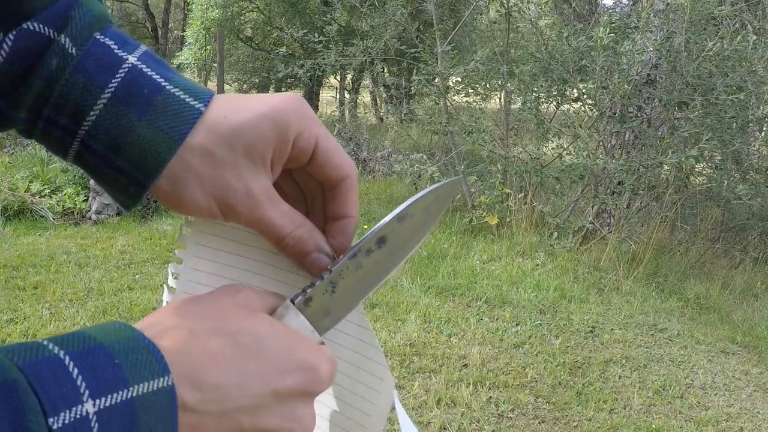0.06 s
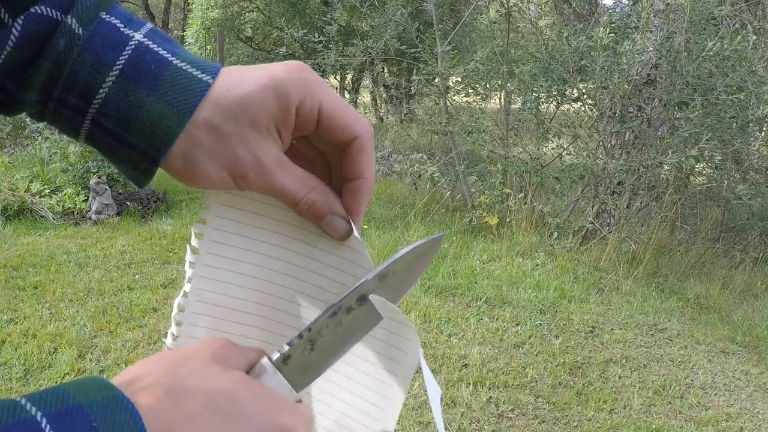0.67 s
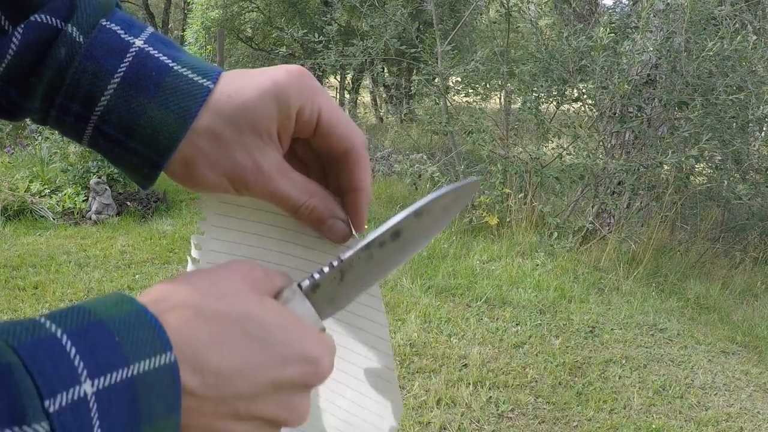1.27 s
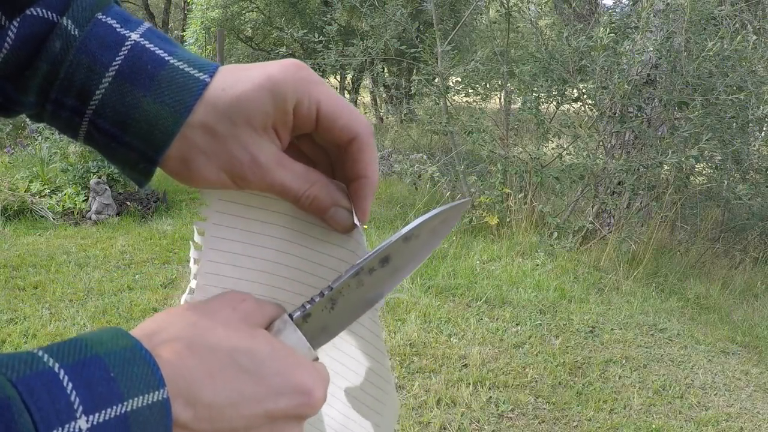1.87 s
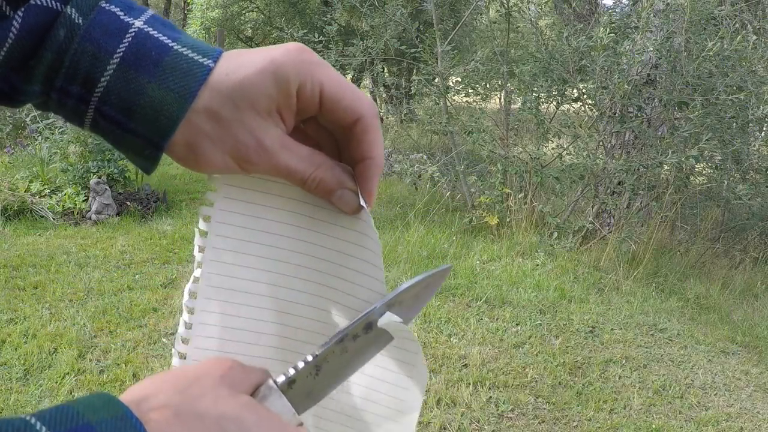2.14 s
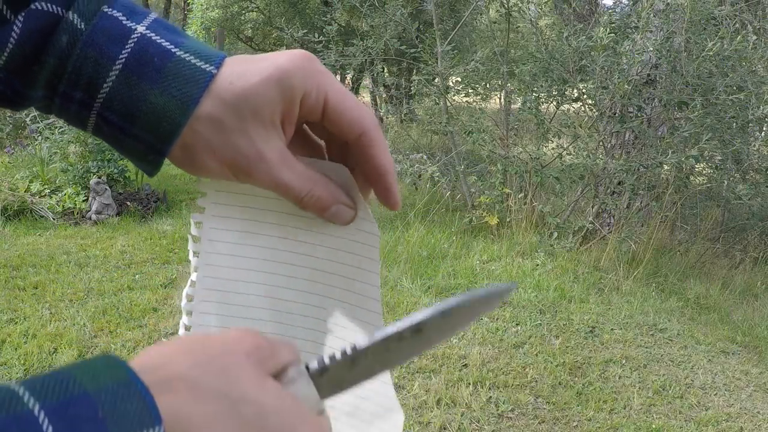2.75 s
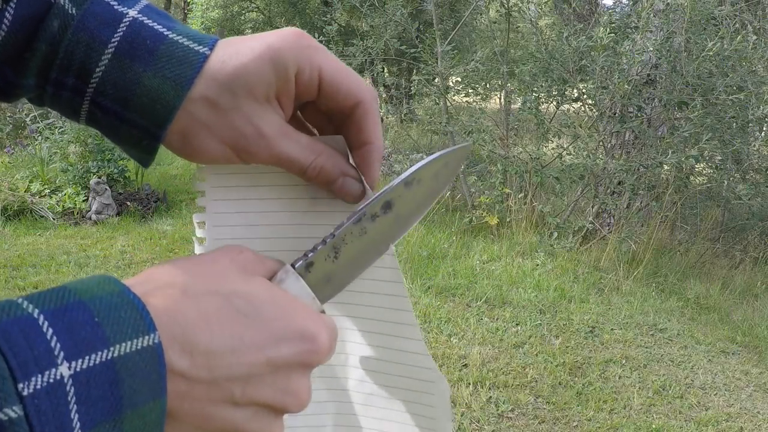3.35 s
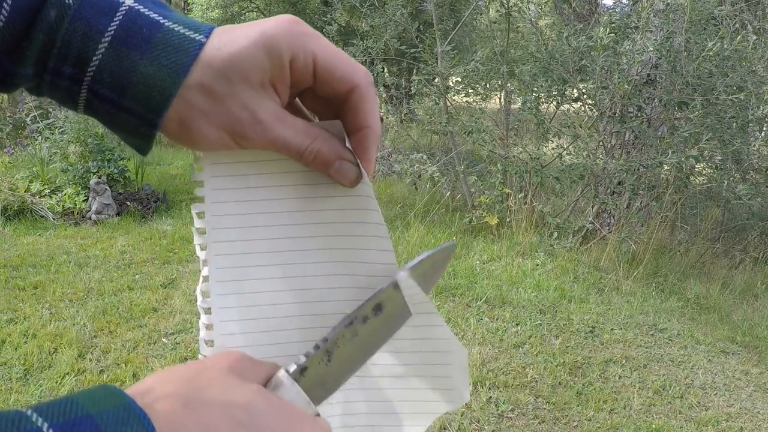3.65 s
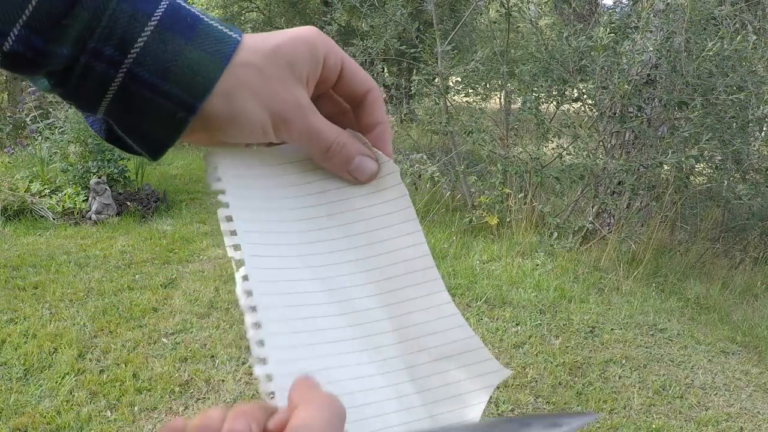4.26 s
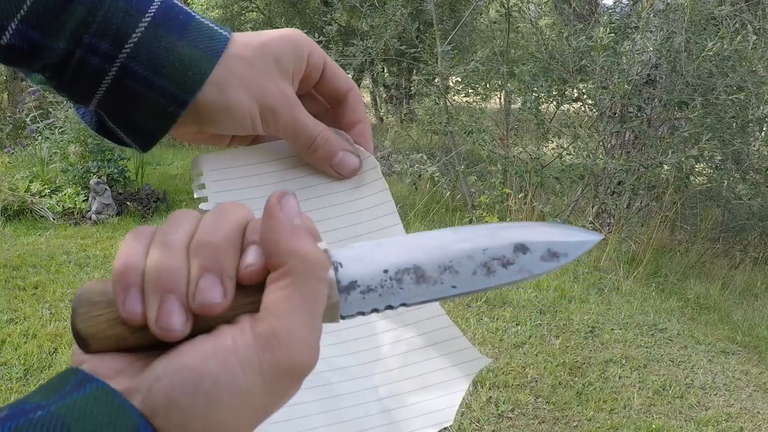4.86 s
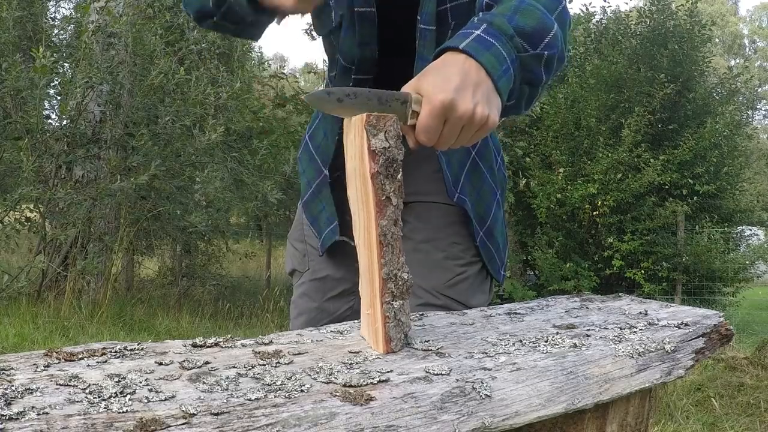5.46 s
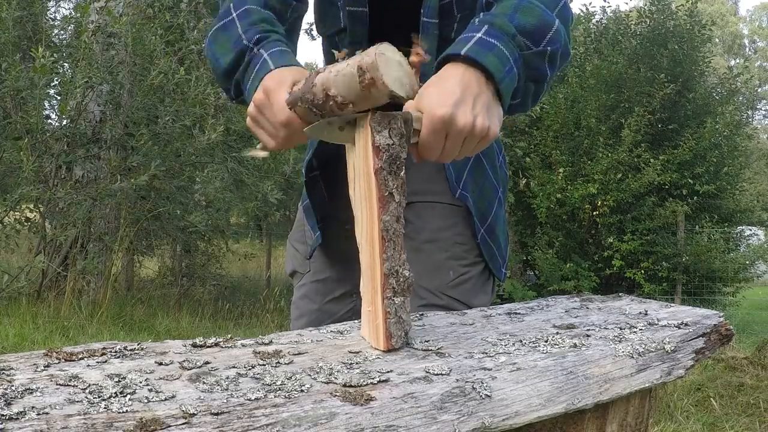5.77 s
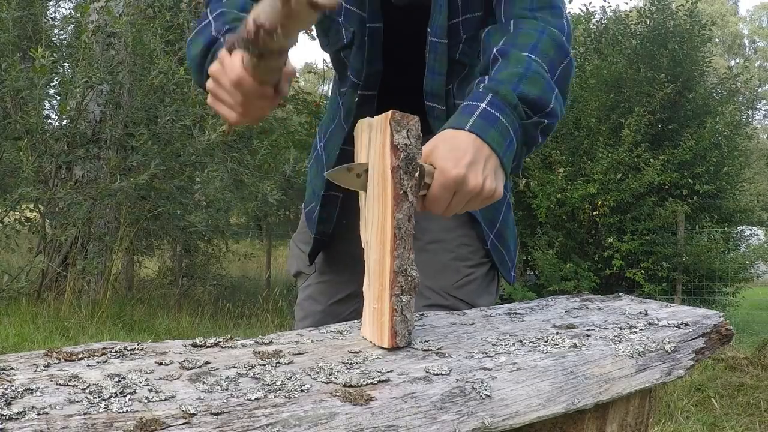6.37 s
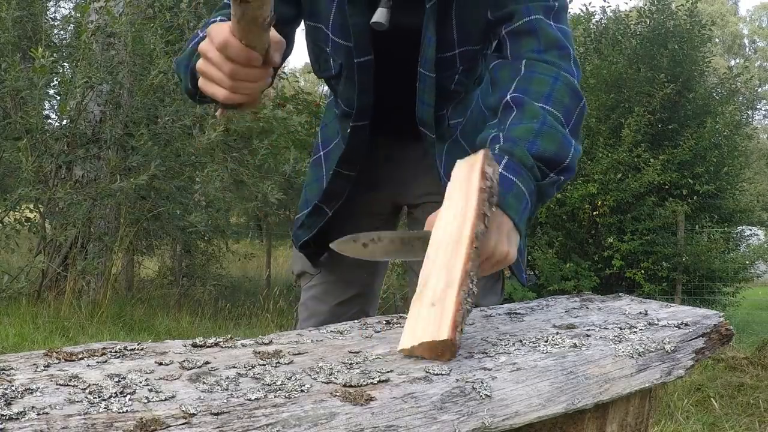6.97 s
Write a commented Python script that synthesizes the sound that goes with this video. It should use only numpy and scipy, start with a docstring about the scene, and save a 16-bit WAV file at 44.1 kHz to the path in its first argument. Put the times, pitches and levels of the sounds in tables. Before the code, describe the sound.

Outdoors, a knife rasps through rustling paper, then a baton knocks the blade through wood, which cracks apart and clatters down.

```python
"""Outdoors, over low wind and distant leaves, a sharp knife slices four strips off a hand-held sheet.
Each cut is thousands of tiny fibres snapping; the paper rustles between cuts and buckles at the end.
Then a wooden baton drives the knife through a piece of wood standing on a log: four cracking thuds
that overload the microphone and echo faintly from the trees. The last blow splits the wood,
and the loose piece clinks and clatters down with faint thin squeaks."""
import sys
import numpy as np
from scipy import signal
from scipy.fft import rfft, irfft
from scipy.io import wavfile
from scipy.ndimage import uniform_filter1d

SR = 44100
rng = np.random.default_rng(int(sys.argv[2]) if len(sys.argv) > 2 else 0)


def wrap_up_sound(samples):
    """Save the sound to the file named by the first command line argument, as 16-bit audio."""
    columns = np.atleast_2d(samples).T
    # keep every value between -1 and 1, then stretch to whole-number steps
    tamed = np.clip(columns, -1, 1)
    steps = np.round(tamed * 32767).astype(np.int16)
    wavfile.write(sys.argv[1], SR, steps)


N = 318843
TIME, HZ = np.arange(N) / SR, np.fft.rfftfreq(N, 1 / SR)

# Loudness along each cut, one list a cut: time_s, sheet_db, hiss_db, fizz_db (last two add to sheet_db)
CUT_LEVELS = [
    [(0.405, -46.5, -1.5, -6), (0.457, -39.5, -4, -11), (0.599, -35.5, -6, -10), (0.649, -32, -6, -9),
     (0.683, -38, 4.5, 0), (0.853, -27.5, 3, -8), (0.885, -29.5, 6.5, -6.5), (0.935, -28.5, 2.5, -6.5),
     (0.962, -31, 7.5, -8)],
    [(1.672, -42, 3, -16), (1.754, -36.5, 0.5, -8), (1.76, -33, -1.5, -11), (1.784, -40.5, 4.5, -0.5),
     (1.978, -36, 3.5, -10)],
    [(2.06, -35.5, 2, -13), (2.092, -31.5, -1, -2), (2.212, -28.5, 0.5, -7.5), (2.282, -28.5, -4, -10),
     (2.348, -30.5, 5, -8), (2.384, -30.5, 1.5, -13), (2.464, -28, -2, 0), (2.485, -31, 0, -3)],
    [(3.345, -49.5, 5.5, -6), (3.379, -39.5, 5, -7), (3.471, -30.5, -5.5, -37), (3.593, -32.5, 0, -13),
     (3.679, -29, 3.5, 2), (3.693, -23.5, 0, -9), (3.731, -27, 2.5, 0), (3.797, -25.5, -2.5, -22),
     (3.865, -21, -7, -21), (3.98, -27, 1.5, -4)],
]
# How the edge grips in each cut: flutter_db (adds to sheet_db), rasp_hz, judder_share (0 to 1)
CUT_GRIPS = [(-11, 5960, .3), (-10.5, 5100, .85), (-11.5, 5650, 0.1), (-12, 5900, 0.6)]
# Tone of the sheet in each of the four cuts: pitch_hz, level_db
CUT_1_TONE = [(88, -45), (150, -18.5), (352, -5.5), (462, -9), (509, -4.5), (681, -21.5), (844, -10),
              (1290, -3), (1830, -11), (2400, -9), (2980, -7), (4220, -9), (4750, -12), (7000, -8),
              (11800, -14), (15500, -23.5)]
CUT_2_TONE = [(88, -37), (150, -1), (366, 3), (656, -11.5), (827, -5), (1240, -6), (1370, 1), (1540, -6.5),
              (2500, -5), (2760, -3), (4060, -9), (5540, -2.5), (9000, -8.5), (10300, -4.5), (15500, -18)]
CUT_3_TONE = [(88, -45), (150, -5.5), (205, 7.5), (268, -2), (445, 3), (681, -12.5), (1000, -6.5),
              (1320, -4), (1830, -13.5), (2500, -11.5), (3300, -12.5), (5030, -9.5), (5760, -8), (9540, -8),
              (15500, -20)]
CUT_4_TONE = [(88, -50), (150, -27), (314, -9), (643, -18.5), (827, -7.5), (1370, 0.5), (2100, -3.5),
              (2650, -10), (2980, -6), (3690, -11), (4840, -11.5), (5540, -5), (6730, -11), (13300, -.5),
              (15500, 2)]

# The baton hits the blade: start_s, thud_db, cutoff_hz, tilt_db_per_octave, crack_db, blade_db
BLOWS = [(5.2209, 8, 803, -.5, -7, -25.5), (5.8140, 8, 1195, 0, -5.5, -25.5),
         (6.3034, -14.5, 3003, 6, -3, -3), (6.7538, -13, 3000, 2.5, -8.5, -19.5)]
# Ringing notes of wood and baton, wedged blade and heavy log: pitch_hz, level_db, fade_s (to fall 60 dB)
WOOD_NOTES = [(183.5, -3.5, .036), (277, 2, 0.026), (380, -0.5, 0.017), (545, -7, 0.023), (775, -6, 0.029),
              (1108, -7, 0.022), (1436, -12, 0.021), (2050, -11.5, 0.0085)]
BLADE_NOTES = [(1830, -14, 0.014), (2550, -25.5, 0.0067), (3110, -9, 0.018), (3318, 1.5, 0.022),
               (3900, -6.5, 0.01), (4660, -16, 0.01), (5700, -15, 0.031), (6930, -13.5, 0.02)]
LOG_NOTES = [(50.3, 2.5, 0.076), (92, 3, .3), (146, 3.5, 0.11), (194, -0.5, 0.14)]
# Wood fibres giving way: start_s, level_db, pitch_hz, fade_s
SPLITS = [(6.206, -30.5, 3000, 0.0088), (6.3144, -15.5, 4920, 0.009), (6.352, -40, 5950, .008),
          (6.430, -43, 9000, .006), (6.7594, -9, 6560, 0.0079), (6.7617, 1, 6760, 0.011),
          (6.7709, 0.5, 5470, 0.0058), (6.804, -23.5, 6060, 0.059), (6.8093, -15.5, 5520, 0.015),
          (6.851, -39, 3980, 0.057)]
# A quick second knock just after the first blow, then the split wood bouncing on the log: start_s, thud_db,
# cutoff_hz, boom_db, tick_db
BOUNCES = [(5.2445, -16.5, 381, -39.5, -43.5), (6.8119, -18, 690, -64, -31.5),
           (6.858, -27.5, 740, -39, -48.5), (7.053, -33.5, 705, -48, -61), (7.118, -37, 607, -45.5, -63),
           (7.145, -53.5, 299, -41.5, -52), (7.1955, -7.5, 396, -50.5, -23.5)]
# The split piece clinks, then faint thin squeaks: start_s, level_db, pitch_hz, spread_octaves, fade_s
CLINK_AND_SQUEAKS = [(6.857, -42, 2810, 0.032, 0.054), (7.052, -60.5, 2000, 0.021, 0.072),
                     (7.092, -63.5, 2026, 0.014, 0.24), (7.152, -69.5, 2750, 0.049, 0.055)]

# The sheet shifting between the fingers: start_s, length_s, crinkle_db, puff_db
RUSTLES = [(0.0, 0.032, -48.5, -52), (0.146, 0.015, -56, -74), (0.365, 0.042, -47.5, -55),
           (0.977, 0.012, -56, -40.5), (1.019, 0.19, -50, -58), (1.484, 0.0092, -51, -55),
           (1.545, 0.012, -51, -71), (1.996, 0.064, -39.5, -59), (2.494, .028, -47, -43),
           (2.587, .048, -42, -49.5), (2.711, 0.082, -43, -50), (2.823, 0.11, -44.5, -53.5),
           (2.966, 0.099, -46, -48), (3.111, 0.1, -51.5, -63), (3.231, 0.023, -47, -53),
           (3.299, 0.047, -45.5, -58), (3.972, .03, -45, -38.5), (4.307, .115, -54.5, -45)]
# Tone of the sheet rustling, buckling and pushing air: pitch_hz, level_db
RUSTLE_TONE = [(120, -41), (200, -7.5), (352, -3), (827, -11), (1150, -2), (1810, -7), (2700, -2.5),
               (3610, -6.5), (5390, -3), (10800, -10.5), (15500, -19)]
BUCKLE_TONE = [(88, -47.5), (150, 8), (352, 4), (643, -1), (1400, 8.5), (1910, -11), (2180, 0), (4220, -4),
               (9180, -4), (12000, -10), (15500, -27)]
PUFF_TONE = [(30, -8), (70, -1), (130, -7.5), (220, -6), (400, -3.5), (650, -17.5), (1500, -18),
             (5000, -39.5)]
# Single snaps and scrapes of the paper: start_s, level_db, pitch_hz, spread_octaves, fade_s
PAPER_SNAPS = [(0.403, -33.5, 4000, 0.87, 0.033), (0.982, -27, 1560, 0.55, .045),
               (1.076, -35, 2980, 0.46, .012), (1.186, -46, 8000, 1.1, 0.033),
               (1.487, -42.5, 2000, 1.2, 0.025), (1.7067, -25, 2020, 1.4, 0.014),
               (1.975, -33, 2000, 2.1, 0.007), (2.059, -17, 2010, 1.7, 0.006),
               (2.251, -28.5, 250, 0.72, 0.025), (2.583, -30, 1770, 1.7, 0.011),
               (2.605, -33, 2500, 1.3, 0.028), (2.825, -39, 4200, 1.7, 0.02),
               (3.014, -32.5, 4530, 0.88, 0.01), (3.188, -39, 1300, 0.45, 0.018),
               (3.334, -33, 5130, 0.24, 0.013), (3.361, -32, 5150, 0.14, 0.7),
               (3.434, -12.5, 4450, 0.77, 0.0023), (3.694, -24.5, 350, .7, 0.024),
               (3.872, -22, 321, 0.65, 0.037), (4.009, -25, 1740, 0.71, 0.02),
               (4.204, -27.5, 10900, 0.15, 0.0053), (4.321, -22.5, 4020, 0.48, .03),
               (4.3253, -19, 1586, 0.83, 0.034), (4.326, -7, 5600, 0.34, 0.0045),
               (4.353, -22.5, 8000, 0.93, 0.019), (4.363, -24, 1696, 0.64, 0.025),
               (4.375, -23, 1890, 0.61, 0.025)]

# Tone of the long echo from the trees and of one distinct reflection off their edge: pitch_hz, level_db
ECHO_TONE = [(80, -10.5), (250, -22), (450, -9), (900, -8), (1250, -4.5), (1700, -2), (2500, -6),
             (3500, -0.5), (7000, -4.5), (15000, -17)]
REFLECTION_TONE = [(200, -17), (1200, 0), (5000, 2.5), (14000, -3)]
# How long the trees echo: pitch_hz, fade_s
ECHO_FADES = [(100, 0.45), (700, 0.78), (1700, 0.64), (3500, 0.35), (8000, 0.2), (15000, 0.13)]
# Tone of the open air by the paper and by the log: pitch_hz, level_db
PAPER_AIR_TONE = [(12, -15), (20, 6), (35, -2), (119, -13), (342, -18.5), (393, -18), (649, -23),
                  (705, -25), (1040, -23.5), (1450, -28.5), (2760, -31), (14300, -36.5), (15500, -42.5)]
LOG_AIR_TONE = [(12, -36.5), (20, 1.5), (35, -8.5), (49, -12.5), (80, -17.5), (180, -28.5), (581, -33.5),
                (705, -32), (1130, -38.5), (1720, -39.5), (2400, -41), (3450, -42), (15500, -46)]
# Gain on the difference between left and right, for paper, wood and air: pitch_hz, gain_db
PAPER_WIDTH = [(60, -3.5), (130, -8.5), (290, -27), (640, -30.5), (1410, -54.5), (3100, -35), (6820, -12.5),
               (15000, -18)]
WOOD_WIDTH = [(60, -20.5), (130, -20.5), (290, -24.5), (640, -26), (1410, -23.5), (3100, -19), (6820, -16),
              (15000, -12)]
AIR_WIDTH = [(25, -15), (60, -8.5), (110, -4), (200, -5), (380, -8), (700, -6), (1290, -8), (2380, -4.5),
             (4400, -1), (8120, -1), (15000, 1.5)]


def slicing():
    """The edge parts thousands of fibres a second; the sheet flutters, rings and hisses with them."""
    out = np.zeros(N)
    clicks = drifting(fibres(per_s=15000, spread_db=2.5), depth_db=2.5)
    clicks *= flicker(depth_db=0.8, rate_hz=92.5)
    # The strip peeling off the blade has a rasping note of its own, which wanders as it curls.
    cut_ends_s = [rows[k][0] for rows in CUT_LEVELS for k in (0, -1)]
    rasp_hz = np.interp(TIME, cut_ends_s, np.repeat([hz for _, hz, _ in CUT_GRIPS], 2))
    rasp_hz *= 1 + 0.09 * wander(rate_hz=9)
    spectrum = rfft(clicks + 0.65 * resonate(clicks, rasp_hz, width_hz=2200))
    # Four bands, low to high: flutter follows the sheet; hiss and fizz swell in their own way.
    lowpasses = [1 / (1 + (HZ / hz) ** 8) for hz in (130, 750, 3000, 10500, 20000)]
    tones = [CUT_1_TONE, CUT_2_TONE, CUT_3_TONE, CUT_4_TONE]
    for rows, (flutter_db, _, judder_share), tone in zip(CUT_LEVELS, CUT_GRIPS, tones):
        times_s, sheet_db, hiss_db, fizz_db = np.transpose(rows)
        cut = spectrum * amp(value_at(tone, HZ))
        jerks = judder(times_s[0], judder_share)
        for lower, upper, band_db in zip(lowpasses, lowpasses[1:], [flutter_db, 0, hiss_db, fizz_db]):
            band = normalised(irfft(cut * (upper - lower), N))
            out += band * stroke(times_s, sheet_db + band_db) * jerks
    return amp(-0.38) * out


def fibres(per_s, spread_db):
    """Breaking fibres make random clicks, a few much louder than the rest."""
    sizes = amp(spread_db * np.minimum(rng.exponential(1, N), 4)) * rng.choice([-1, 1], N)
    return sizes * (rng.random(N) < per_s / SR)


def stroke(times_s, levels_db, bite_s=0.016, leave_s=0.0059):
    """Loudness of one cut, from the bite of the edge until it leaves the paper."""
    outside = np.maximum(times_s[0] - TIME, 0) / bite_s + np.maximum(TIME - times_s[-1], 0) / leave_s
    return amp(np.interp(TIME, times_s, levels_db)) * np.exp(-outside ** 2)


def judder(start_s, start_share, slips_per_s=130, slip_s=0.0025, settle_s=0.15):
    """Loudness of an edge that sticks and slips at first, then settles into a glide."""
    slips = (rng.random(N) < slips_per_s / SR) * rng.uniform(0.44, 1, N)
    power = signal.lfilter([1], [1, -np.exp(-1 / (slip_s * SR))], slips)
    share = start_share * np.exp(-((TIME - start_s) / settle_s) ** 2)
    return np.sqrt(1 - share + share * power / power.mean())


def splitting_wood(push_s=0.004):
    """Each blow cracks, rings the blade and thuds into the log; the wood splits, clinks and bounces."""
    out = np.zeros(N)
    blade, log = ring(BLADE_NOTES, rise_cycles=0.54), ring(LOG_NOTES)
    push_age = TIME[:SR // 4] / push_s
    push = push_age * (2 - push_age) * np.exp(-push_age)  # the log is shoved into the ground
    for start_s, thud_db, cutoff_hz, tilt, crack_db, blade_db in BLOWS:
        thud = wood_thud(cutoff_hz, tilt) + amp(-25.5) * log + amp(-16) * np.pad(push, (0, SR // 4))
        add(out, start_s, amp(crack_db) * burst(pitch_hz=2130, octaves=0.91, fade_s=0.022))
        add(out, start_s, amp(thud_db) * thud + amp(blade_db) * blade)
    shake = amp(-20.5) * wood_thud(cutoff_hz=617) + amp(-24) * blade  # set off by each split
    for start_s, level_db, pitch_hz, fade_s in SPLITS:
        add(out, start_s, amp(level_db) * burst(pitch_hz, octaves=0.9, fade_s=fade_s))
        add(out, start_s, amp(level_db) * shake)
    for start_s, thud_db, cutoff_hz, boom_db, tick_db in BOUNCES:
        add(out, start_s, amp(tick_db) * burst(pitch_hz=3200, octaves=0.64, fade_s=0.011))
        add(out, start_s, amp(thud_db) * wood_thud(cutoff_hz) + amp(boom_db) * log)
    for start_s, level_db, pitch_hz, octaves, fade_s in CLINK_AND_SQUEAKS:
        add(out, start_s, amp(level_db) * burst(pitch_hz, octaves, fade_s))
    return out


def wood_thud(cutoff_hz, tilt_db_per_octave=0, pivot_hz=280):
    """The struck wood rings briefly; a harder hit has a higher cutoff and sounds brighter."""
    notes = [(hz, db + tilt_db_per_octave * np.log2(hz / pivot_hz), fade_s)
             for hz, db, fade_s in WOOD_NOTES]
    return ring(notes, cutoff_hz)


def ring(notes, cutoff_hz=SR, rise_cycles=0.85):
    """Struck notes swell over their first cycle, bass last; a soft hit leaves the high ones weak."""
    t = TIME[:SR // 2]
    out = np.zeros(len(t))
    for k, (hz, db, fade_s) in enumerate(notes):
        swell = 1 - np.exp(-(hz * t / rise_cycles) ** 2)
        direction = (-1) ** k  # neighbouring notes swing opposite ways at the far end
        size = amp(db) / np.hypot(1, (hz / cutoff_hz) ** 2)
        out += direction * size * swell * fade(t, fade_s) * np.sin(2 * np.pi * hz * t)
    return out


def rustling():
    """The held sheet crinkles, buckles once, and snaps where the blade catches or leaves it."""
    crinkle = drifting(fibres(per_s=8100, spread_db=3), depth_db=1.4, frames=36, bins=7)
    crinkle *= flicker(depth_db=2.5, rate_hz=55)
    moves = sum(movement(start_s, length_s, db, rise_s=0.0058, fall_s=0.014)
                for start_s, length_s, db, _ in RUSTLES)
    buckle = movement(start_s=4.318, length_s=0.064, level_db=-35, rise_s=0.0024, fall_s=0.013)
    out = amp(-3.5) * normalised(shaped(crinkle, RUSTLE_TONE)) * moves
    out += normalised(shaped(crinkle, BUCKLE_TONE)) * buckle
    for start_s, level_db, pitch_hz, octaves, fade_s in PAPER_SNAPS:
        add(out, start_s, amp(level_db) * burst(pitch_hz, octaves, fade_s))
    return out


def puffing():
    """The loose sheet pushes air in soft, low puffs."""
    puffs = shaped(rng.standard_normal(N), PUFF_TONE) * flicker(depth_db=5, rate_hz=25.6)
    moves = sum(movement(start_s, length_s, db, rise_s=0.01, fall_s=0.028)
                for start_s, length_s, _, db in RUSTLES)
    return amp(-0.5) * normalised(puffs) * moves


def movement(start_s, length_s, level_db, rise_s, fall_s):
    """Loudness of one movement of the sheet: it rises, holds and falls."""
    before = np.maximum(start_s - TIME, 0) / rise_s
    after = np.maximum(TIME - start_s - length_s, 0) / fall_s
    return amp(level_db) * np.exp(-np.minimum(before + after, 20))


def echoes(sound, near_db, near_fade_s, far_db, blur_hz=100):
    """Sound scatters quickly off the ground and log, then comes back faintly from the trees."""
    t = TIME[:SR]
    far_taps, near_taps = rng.standard_normal((2, SR)) * (rng.random((2, SR)) < 0.1)
    hz, frame_s, spectra = signal.stft(far_taps, SR, nperseg=256)
    spectra *= fade(frame_s, value_at(ECHO_FADES, hz)[:, None])
    far_tail = signal.istft(spectra, SR, nperseg=256)[1][:SR] * (1 - np.exp(-t / 0.03))
    near_tail = near_taps * fade(t, near_fade_s) * (t > 0.005)
    blur = 2 * np.pi * np.cumsum(blur_hz * wander(rate_hz=201.4)) / SR  # smears notes into a wash
    far = phase_shifted(scattered(sound, far_tail), blur)
    return amp(far_db) * shaped(far, ECHO_TONE) + amp(near_db) * scattered(sound, near_tail)


def open_air(tone, level_db):
    """Lumpy low wind blows under a steady hiss of distant leaves."""
    middle, side = (normalised(shaped(rng.standard_normal(N), tone)) for _ in range(2))
    side = shaped(side, AIR_WIDTH)
    both = np.array([middle + side, middle - side])
    wind = irfft(rfft(both) / (1 + (HZ / 250) ** 4), N)
    leaves = both - wind
    return amp(level_db) * (leaves + wind * flicker(depth_db=3.5, rate_hz=7.3))


def stereo(sound, width):
    """Two close microphone openings hear slightly different pressure and a shifting scatter."""
    tail = rng.standard_normal(512) * np.exp(-np.arange(512) / 90)
    scatter = phase_shifted(scattered(sound, tail), 2 * wander(rate_hz=4))
    side = shaped(drifting(0.55 * np.gradient(sound) + 0.7 * scatter, depth_db=4), width)
    return np.array([sound + side, sound - side])


def burst(pitch_hz, octaves, fade_s, samples=8192):
    """A dying puff of noise around one pitch."""
    hz = np.fft.rfftfreq(samples, 1 / SR) + 1
    bump = 1 / np.cosh(np.clip(np.log2(hz / pitch_hz) / octaves, -20, 20))
    noise = normalised(irfft(bump * np.exp(2j * np.pi * rng.random(len(hz)))))
    return noise * fade(TIME[:samples], fade_s)


def drifting(sound, depth_db, frames=30, bins=6):
    """Makes the tone drift at random, as a sheet's does when it bends and the cut grows longer."""
    spectra = signal.stft(sound, nperseg=512, noverlap=384)[2]
    drift = uniform_filter1d(rng.standard_normal(spectra.shape), frames, axis=1)  # smooth over time
    drift = uniform_filter1d(drift, bins, axis=0)  # and over pitch
    return signal.istft(spectra * amp(depth_db * normalised(drift)), nperseg=512, noverlap=384)[1][:N]


def resonate(sound, pitch_hz, width_hz):
    """Picks out a band of the sound around a moving pitch."""
    turn = np.exp(2j * np.pi * np.cumsum(pitch_hz) / SR)
    feedback = np.exp(-np.pi * width_hz / SR)
    return 2 * (turn * signal.lfilter([1 - feedback], [1, -feedback], sound / turn)).real


def scattered(sound, tail):
    """Spreads a sound into the many small echoes of a tail."""
    return signal.fftconvolve(sound, tail / np.linalg.norm(tail))[:N]


def phase_shifted(sound, radians):
    """Moves every wave in a sound along its cycle."""
    return (signal.hilbert(sound) * np.exp(1j * radians)).real


def flicker(depth_db, rate_hz):
    """A gain that goes up and down at random."""
    return amp(depth_db * wander(rate_hz))


def wander(rate_hz):
    """A smooth random curve that changes up to about rate_hz times a second."""
    return normalised(irfft(rfft(rng.standard_normal(N)) / (1 + (HZ / rate_hz) ** 4), N))


def shaped(sound, tone):
    """Filters a full-length sound by a tone table."""
    return irfft(rfft(sound) * amp(value_at(tone, HZ)), N)


def value_at(table, hz):
    """Reads between a table's rows on a scale of octaves."""
    pitches_hz, values = np.transpose(table)
    return np.interp(np.log(hz + 1), np.log(pitches_hz + 1), values)


def fade(t, fade_s):
    """A gain that falls 60 dB every fade_s."""
    return np.exp(-np.log(1000) * t / fade_s)


def amp(db):
    """Turns decibels into gain."""
    return 10 ** (np.asarray(db) / 20)


def normalised(sound):
    """Scales to an average power of 1."""
    return sound / np.sqrt(np.mean(sound ** 2) + 1e-20)


def add(mix, start_s, sound):
    """Mixes a sound in at start_s."""
    part = mix[round(start_s * SR):][:len(sound)]
    part += sound[:len(part)]


def scene(wood_start_s=5.21):
    """Paper first, then wood, each with its own open air."""
    paper = slicing() + rustling() + puffing()
    knocks = splitting_wood()
    paper += echoes(paper, near_db=-18, near_fade_s=0.049, far_db=-43.5)
    wood = knocks + echoes(knocks, near_db=-24.5, near_fade_s=0.24, far_db=-30)
    add(wood, 0.0897, amp(-42) * shaped(knocks, REFLECTION_TONE))  # one reflection off the tree line
    air = np.where(TIME < wood_start_s, open_air(PAPER_AIR_TONE, -50), open_air(LOG_AIR_TONE, -49.5))
    lean_right = amp([[-0.2], [0.2]])
    return stereo(paper, PAPER_WIDTH) * lean_right + stereo(wood, WOOD_WIDTH) + air


def record(dry, threshold_db=-15, share=0.55, recovery_db_per_s=22, top_hz=15600):
    """Automatic volume reacts too late for the blows, which clip, and turns down what follows."""
    power = signal.lfilter([1 / 512], [1, 1 / 512 - 1], (dry ** 2).mean(0))
    recovery_db = TIME * recovery_db_per_s
    held_db = np.maximum.accumulate(10 * np.log10(power + 1e-12) + recovery_db) - recovery_db
    over_db = np.maximum(held_db - threshold_db, 0)
    late_db = signal.lfilter([1 / 2048], [1, 1 / 2048 - 1], over_db)
    lowered = dry * amp(-share * late_db)
    clipped = lowered / (1 + lowered ** 8) ** (1 / 8)
    treble_cut = signal.firwin(301, top_hz, window=("kaiser", 8), fs=SR)
    return signal.oaconvolve(clipped, treble_cut[None], "same")


dry = scene()
out = record(dry)
wrap_up_sound(out)
```